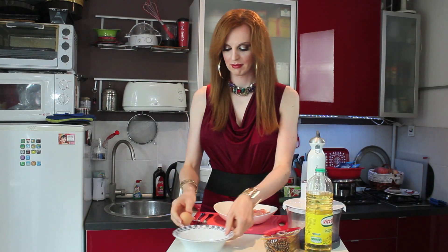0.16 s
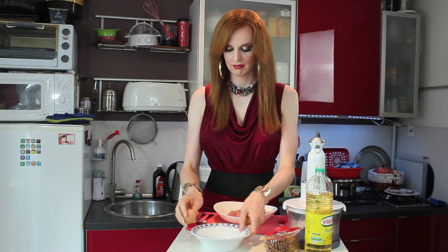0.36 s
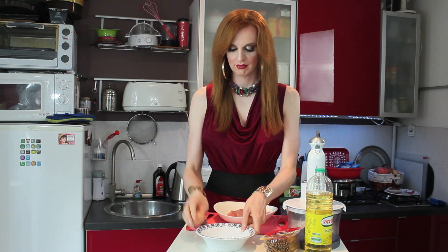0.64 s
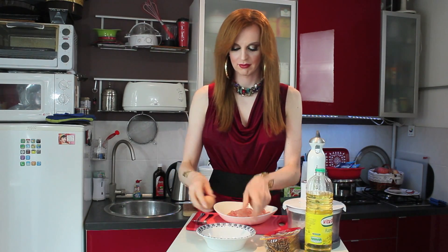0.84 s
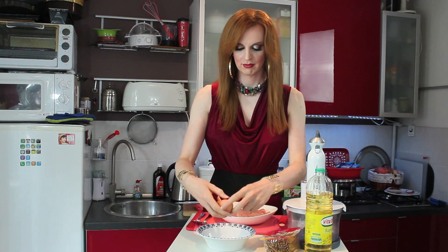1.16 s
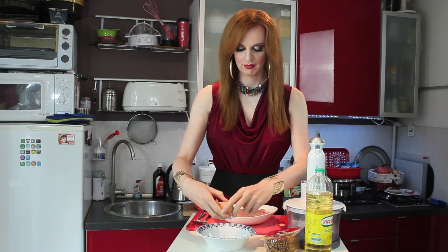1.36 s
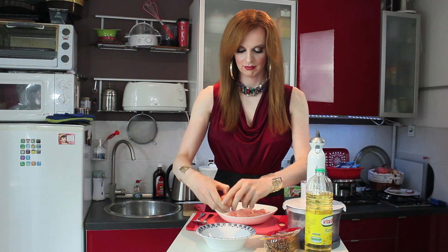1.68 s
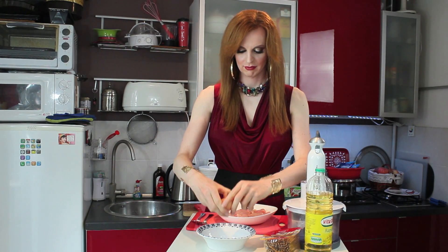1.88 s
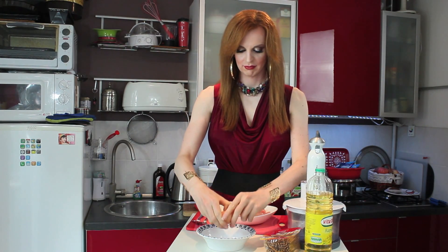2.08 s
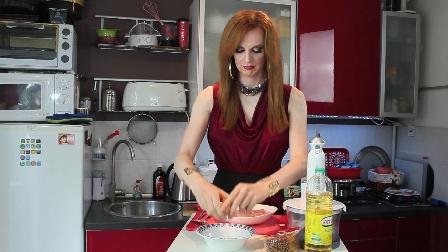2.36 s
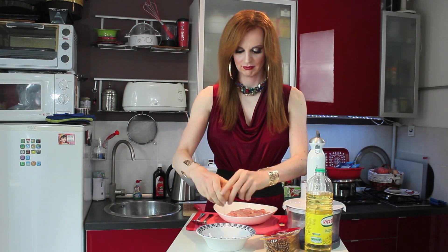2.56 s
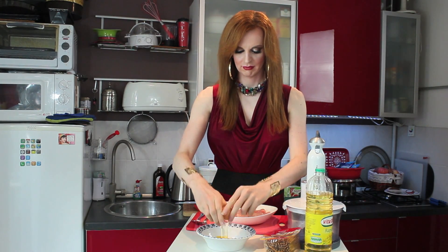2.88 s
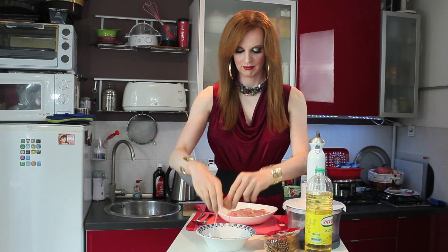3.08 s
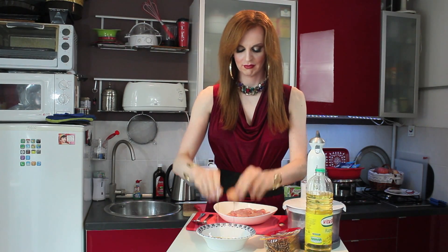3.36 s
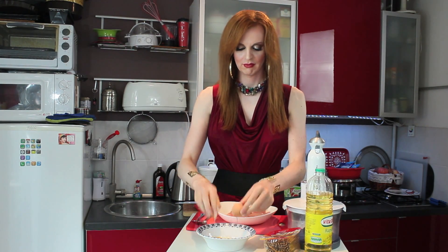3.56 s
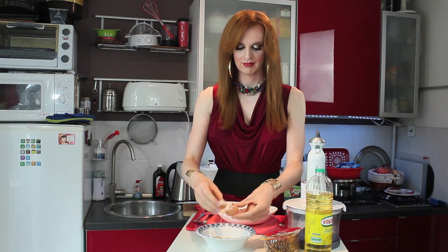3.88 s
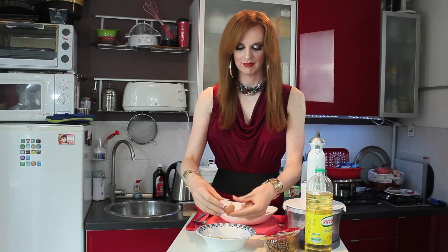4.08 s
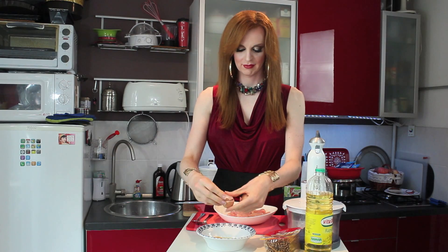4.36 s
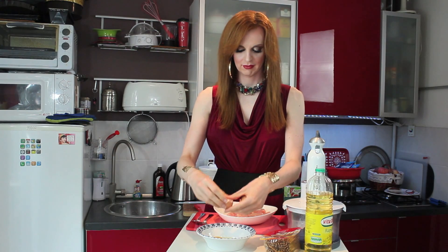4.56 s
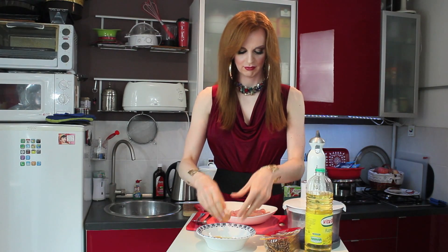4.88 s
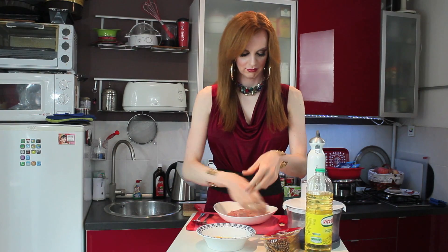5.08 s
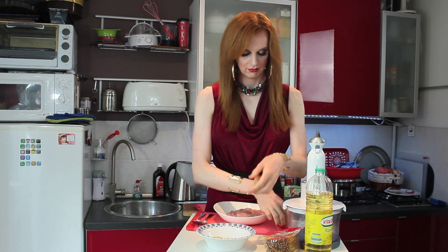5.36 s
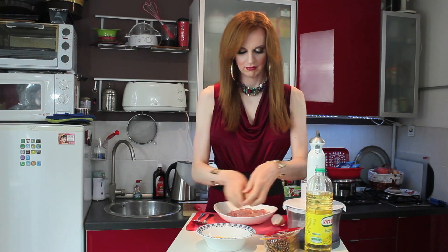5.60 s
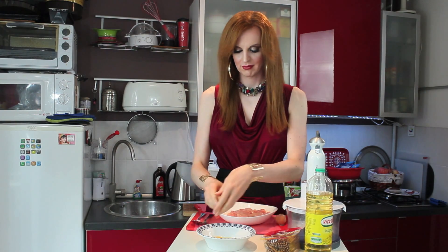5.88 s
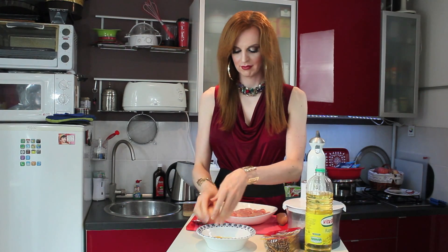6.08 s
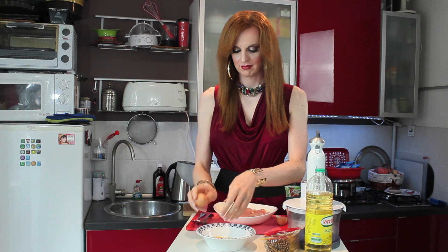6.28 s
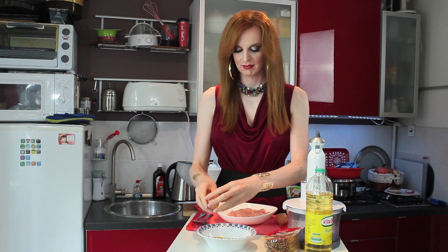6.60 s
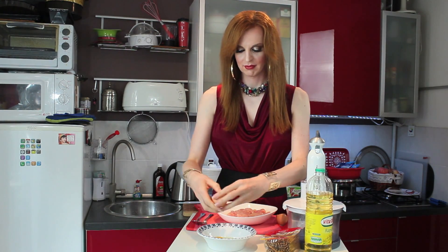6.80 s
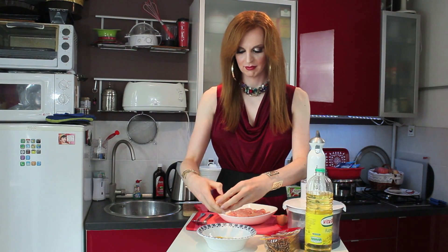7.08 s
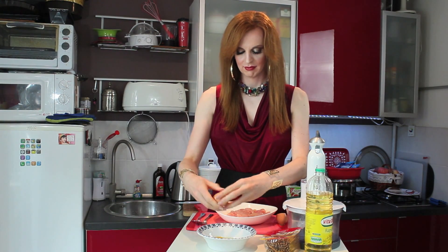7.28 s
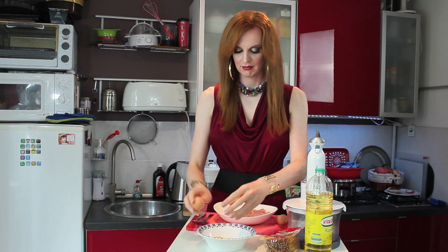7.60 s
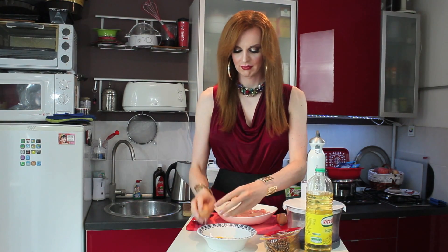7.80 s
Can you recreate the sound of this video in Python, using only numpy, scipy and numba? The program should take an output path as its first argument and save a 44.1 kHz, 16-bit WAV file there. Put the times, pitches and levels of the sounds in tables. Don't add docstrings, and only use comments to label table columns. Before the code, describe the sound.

Eggs knock sharply on a ceramic bowl rim that rings briefly, shells crackle and tear under thumbs, bowl jolts on a hollow worktop in a small kitchen.

```python
import sys
import numpy as np
from scipy import signal
from scipy.fft import rfft, irfft, next_fast_len
from scipy.io import wavfile
from numba import njit

SR = 44100
rng = np.random.default_rng(int(sys.argv[2]) if len(sys.argv) > 2 else 0)


def boost(x):
    u = np.asarray(x, float) / 20
    return 10 ** u


def dump_mix(stems):
    frames = np.atleast_2d(stems).T
    limited = np.clip(frames, -1, 1)
    pcm = np.round(limited * 32767).astype(np.int16)
    wavfile.write(sys.argv[1], SR, pcm)


N = 350154
SPAN = 4096

# (time [s], crack level [dB], crack pitch [Hz], crack treble [dB], crushing time [ms])
BLOWS = [
    (0.6711, 5, 1610, -6, 1.87),
    (6.1872, -9, 2400, -32.5, 1.6),
    (6.4611, 5, 2310, -13.5, 3.1),
    (7.7795, -1, 2800, -14.5, 3.2),
]
# (time [s], level against the last blow [dB])
BRUSH = (.901, -41)
BOWL_HZ = [229, 288, 953, 1056, 2462, 2587, 3715, 4130, 4182, 6000, 6097, 6420, 7938, 8175, 8302, 8690,
           9450, 10460, 11250, 12990, 13800]
# (time to fade by 60 dB [s], level at each of the four blows [dB] x 4)
RINGING = [(0.7, -32.5, -29, -24.5, -32), (0.64, -36.5, -29.5, -42.5, -22.5),
           (0.18, -16.5, -15.5, -29, -21), (1, -47, -36.5, -25, -37), (0.36, -24.5, -4.5, -11, -19.5),
           (0.087, -9, -30.5, -9.5, -11), (0.13, -72.5, -25, -10.5, -19.5),
           (0.25, -40.5, -28.5, -16.5, -19), (0.2, -24.5, -21.5, -19, -18.5), (0.24, -24, -33.5, -32, -51),
           (0.17, -35, -26.5, -22.5, -25.5), (0.42, -64, -49.5, -42.5, -55),
           (0.27, -31.5, -41.5, -28.5, -28.5), (0.11, -33.5, -25, -11, -19), (.19, -23, -32.5, -32.5, -20),
           (0.29, -32, -47.5, -26.5, -29), (0.057, -54, -55.5, -41, -26), (0.11, -32.5, -42.5, -42, -23),
           (0.25, -50.5, -45, -46.5, -33), (.12, -29.5, -49, -34, -24), (.14, -42, -53.5, -30, -31)]

# (time [s], hollow note level [dB], hollow note pitch [Hz], edge snap level [dB])
SNAPS = [(1.53, -19, 1830, -24.5), (1.543, -36, 1380, -49), (1.574, -32, 1090, -29.5),
         (1.656, -26, 1730, -36.5), (1.722, -33, 1540, -41.5), (2.695, -25, 2940, -25),
         (2.779, -20, 2660, -37.5), (3.061, -22, 2350, -36.5), (3.089, -26.5, 2360, -46.5),
         (3.276, -23, 2310, -31.5), (4.084, -19, 1840, -36), (4.155, -31.5, 1700, -50),
         (4.337, -17.5, 1660, -43), (4.36, -28, 2000, -43.5), (4.42, -35, 1600, -49),
         (4.533, -50, 1540, -59), (4.94, -16.5, 1144, -44), (4.945, -23.5, 1690, -51.5)]
# (time [s], hollow level [dB], hollow pitch [Hz], edge snap level [dB])
CRUNCH = [
    (2.723, -10.5, 2130, -19),
    (2.738, -4.5, 2820, -33),
    (2.751, -14.5, 2210, -33.5),
    (4.491, -4.5, 1622, -24),
    (4.509, -35, 1520, -31.5),
]
# (time [s], hollow level [dB], hollow pitch [Hz], edge level [dB])
CLICKS = [
    (0.173, -39, 1220, -52),
    (5.361, -21.5, 1203, -56.5),
    (5.69, -34.5, 1260, -74),
    (5.759, -35.5, 1550, -66),
    (6.679, -37, 1130, -53),
]
# (time [s], hollow level [dB], hollow pitch [Hz], edge snap level [dB], tearing time [ms])
TEARS = [(1.422, -54, 3000, -54, 8), (1.466, -46, 3100, -61, 6.7), (1.498, -63, 1970, -45.5, 6.7),
         (1.643, -35, 1170, -37.5, 15), (2.336, -41, 1050, -51, 3.7), (2.678, -25.5, 2030, -43.5, 33),
         (2.931, -32, 2020, -48, 5.4), (2.951, -42, 2420, -49.5, 7.1), (3.899, -44, 2180, -58, 6.3),
         (4.067, -26, 1770, -40.5, 3.6), (4.279, -39.5, 1760, -62, 5.3), (4.303, -23.5, 1650, -50, 27),
         (4.41, -33, 1660, -51.5, 18), (4.443, -29, 1760, -46.5, 13), (4.466, -16.5, 1570, -33, 12),
         (4.802, -39.5, 1340, -65, 5.7)]
# (frequency [Hz], level [dB])
EDGE = [(250, -6), (800, 8), (3100, 13.5), (5600, 4.5), (9100, -3), (13100, -4), (16100, -9)]
SNAP_TILT_DB, CRUNCH_TILT_DB, CLICK_TILT_DB, TEAR_TILT_DB = 5.5, 2.5, -1, 3.2

# (time [s], panel level [dB], panel pitch [Hz], foot level [dB], contact [ms])
JOLTS = [(0.132, -20, 370, -38.5, 2.4), (0.154, -17, 235, -32.5, 5.8), (0.6735, -8.5, 271, -10.5, 6.4),
         (6.1863, 0.5, 319, -5, 4.1), (6.19, 6, 334, -4.5, 1.17), (6.23, -12, 240, -18, 10.5),
         (6.4622, -8, 270, -10.5, 6.2), (6.517, 0, 235, -13, 5.2), (6.558, -10.5, 440, -15.5, 6.2),
         (6.589, -20, 257, -37, 3), (7.787, -5, 252, -12.5, 6), (7.827, -2, 580, -1.5, 2.4),
         (7.832, 12.5, 387, 0, 0.77), (7.868, -10, 225, -36, 5.9)]
# (time [s], panel level [dB], foot level [dB], loudest foot pitch [Hz])
SET_DOWN = [(2.695, -40, -59, 740), (2.725, -44, -53, 740), (5.36, -12.5, -18, 1190),
            (5.388, -27, -25, 734), (5.479, -25, -48, 716), (5.579, -42, -48, 805), (5.705, -43, -54, 1260),
            (5.797, -41, -57, 1440), (6.002, -14, -33.5, 1320), (6.046, -24, -33.5, 743),
            (6.083, -27, -46.5, 756), (6.108, -51.5, -55, 732)]
# (frequency [Hz], width [Hz], level [dB])
PANELS = [(257.5, 26, 0.5), (336.8, 39, -3.5), (417, 33, -0.5), (466.5, 12, 2.5), (499, 52, -5.5),
          (595, 45, -2.5)]
# (frequency [Hz], width [Hz], level [dB])
FOOT = [(720, 190, 0.5), (1046, 250, 4.5), (1260, 386, 0), (1516, 68, -4.5), (1540, 910, -11)]

# (time [s], drag level [dB])
SLIDE = [
    (0.171, -39),
    (0.178, -31),
    (0.222, -54),
    (0.262, -47),
    (0.392, -38.5),
    (0.5, -49.5),
    (0.649, -70.5),
]
# (level at middling drag [dB], growth per dB of drag [dB])
DRAGGED = [
    (-46.5, .6),
    (-44.5, 0.59),
    (-48.5, 1.3),
]
# (frequency [Hz], level per Hz [dB])
GRIT = [(880, -17), (1500, 0.5), (2320, -7), (3880, -5.5), (5770, -10.5), (7320, -12), (16000, -26.5)]

# (frequency [Hz], time to fade by 60 dB [s])
KITCHEN = [(200, 0.25), (500, 0.3), (2000, 0.24), (6000, 0.25), (14000, 0.17)]
# (frequency [Hz], level per Hz [dB])
HISS = [(12, -34), (20, -28), (27, -14.5), (79, -17), (147, -18.5), (296, -14), (936, -12.5), (1310, -13.5),
        (1640, -13), (14300, -25), (16400, -24.5)]


def bowl_crack():
    s, db, hz, treble_db, ms = np.transpose(BLOWS)
    low = filtered(bursts(ms, spiky_db=1.0), lambda f: resonance(f, hz[:, None], 1300))
    high = filtered(bursts(ms, spiky_db=-12.0), lambda f: resonance(f, 9140, 9800) ** 2)
    return placed(s, sized(low, db - 8, ms) + sized(high, treble_db - 4, ms))


def bowl_ring():
    t = np.arange(SR)[None] / SR
    s, crack_db, *_, ms = np.transpose(BLOWS)
    rocking_db = 3.2 + 0.26 * crack_db
    ring = 0
    for hz, (t60, *levels_db) in zip(BOWL_HZ, RINGING):
        knots = rng.standard_normal((len(s), 64))
        wobble = np.tile(signal.resample(knots, SR // 2, axis=1), 2)
        rocking = wobble * np.exp(-t / 0.2)
        flutter = rocking * rocking_db[:, None] * min(hz / 2500, 1)
        strength = boost(np.array(levels_db)[:, None] + flutter - 60 * t / t60)
        ring = ring + strength * np.sin(2 * np.pi * hz * t + flutter / 4)
    ring = ring * (1 - np.exp(-2000 * t / ms[:, None]))
    brush_s, brush_db = BRUSH
    return placed(np.append(s, brush_s), np.vstack([ring, boost(brush_db) * ring[-1]]))


def shell(events, swell_ms):
    s, db, hz, snap_db, ms, tilt_db = np.transpose(events)
    hz, tilt_db = hz[:, None], tilt_db[:, None]
    slips = bursts(ms, spiky_db=2.5, swell_ms=swell_ms)

    def hollow_body(f):
        return resonance(f, hz, 0.37 * hz) ** 2 + boost(-28) * resonance(f, 3.01 * hz, hz) ** 2

    def edge_colour(f):
        octaves = np.log2(np.clip(f, 2000, None) / 5000)
        return colour(EDGE)(f) * boost(tilt_db * octaves)

    hollow = filtered(slips, hollow_body)
    edge = filtered(slips, edge_colour)
    return placed(s, sized(hollow, db - 9, ms) + sized(edge, snap_db + 2, ms))


def fractures():
    events = []
    for rows, tilt_db in ((SNAPS, SNAP_TILT_DB), (CRUNCH, CRUNCH_TILT_DB), (CLICKS, CLICK_TILT_DB)):
        for row in rows:
            running_ms = 1.24 - 0.19 * row[1]
            events.append((*row, running_ms, tilt_db))
    return sorted(events)


def tears():
    return [(*row, TEAR_TILT_DB) for row in TEARS]


def thuds():
    s, db, hz, reach_hz, foot_db, foot_hz, ms = np.transpose(knocks())
    hz, reach_hz, foot_hz = hz[:, None], reach_hz[:, None], foot_hz[:, None]
    low = filtered(bursts(ms, spiky_db=3.5), lambda f: body(PANELS)(f) * resonance(f, hz, reach_hz) ** 2)
    mid = filtered(bursts(ms, spiky_db=0.5), lambda f: body(FOOT)(f) * resonance(f, foot_hz, 900))
    return placed(s, sized(low, db - 5, ms) + sized(mid, foot_db + 1, ms))


def knocks():
    jolt_reach_hz, jolt_foot_hz = 247, 1072
    panel_hz, reach_hz, contact_ms = 340, 121, 4.4
    events = []
    for s, db, hz, foot_db, ms in JOLTS:
        events.append((s, db, hz, jolt_reach_hz, foot_db, jolt_foot_hz, ms))
    for s, db, foot_db, foot_hz in SET_DOWN:
        events.append((s, db, panel_hz, reach_hz, foot_db, foot_hz, contact_ms))
    return sorted(events)


def slide():
    s, drag_db = np.transpose(SLIDE)
    t = np.arange(N) / SR
    middling_db = -45
    responses = (lambda f: body(PANELS)(f) * resonance(f, 170, 200), body(FOOT), colour(GRIT))
    out = np.zeros(N)
    for (db, grows), response in zip(DRAGGED, responses):
        slips = rng.standard_normal(N) * boost(2.2 * rng.exponential(size=N))
        rub = filtered(slips, response)
        level_db = np.interp(t, s, db + grows * (drag_db - middling_db), left=-120, right=-120)
        out += rub / rub.std() * boost(level_db)
    return out


def low_boom():
    s, db, *_, contact_ms = np.transpose(JOLTS)
    ms = np.full(len(s), 30)
    boom = filtered(bursts(ms, spiky_db=5.0, swell_ms=4.6), lambda f: resonance(f, 116, 110) ** 2)
    return placed(s, sized(boom, db + 10 * np.log10(contact_ms) - 45, ms))


def kitchen(x, piece):
    rows = np.pad(x, (0, -N % piece)).reshape(-1, piece)
    noise = rng.standard_normal((len(rows), SR // 2))
    hz, t, z = signal.stft(noise, SR, nperseg=256)
    fade = boost(-60 * t / along(KITCHEN, hz)[:, None])
    tails = signal.istft(z * fade, SR, nperseg=256)[1]
    tails /= np.linalg.norm(tails, axis=1, keepdims=True)
    starts = np.arange(len(rows)) * piece / SR + 0.003
    return placed(starts, signal.fftconvolve(rows, tails, axes=1))


def hiss():
    x = filtered(rng.standard_normal(N), lambda f: boost(along(HISS, f)))
    return x / x.std() * boost(-56)


def bursts(ms, spiky_db, swell_ms=0.092):
    shape, t_ms = (len(ms), SPAN), np.arange(SPAN) * 1000 / SR
    slips = rng.standard_normal(shape) * boost(spiky_db * rng.exponential(size=shape))
    swell = 1 - np.exp(-t_ms / swell_ms)
    return slips * swell * np.exp(-t_ms / np.minimum(ms, 30)[:, None])


def sized(rows, db, ms):
    energy = np.minimum(ms, 30) * SR / 2000
    return rows / np.linalg.norm(rows, axis=1, keepdims=True) * (boost(db) * np.sqrt(energy))[:, None]


def placed(times, rows):
    at = np.round(times * SR).astype(int)[:, None] + np.arange(rows.shape[1])
    return np.bincount(at.ravel(), rows.ravel(), N + rows.shape[1])[:N]


def resonance(f, hz, width_hz):
    return 1j * f * width_hz / (hz * hz - f * f + 1j * f * width_hz)


def body(modes):
    def response(f):
        return sum((-1) ** k * boost(db) * resonance(f, hz, w) for k, (hz, w, db) in enumerate(modes))
    return response


def colour(points):
    def response(f):
        cepstrum = irfft(np.log(boost(along(points, f)) + 1e-6))
        cepstrum[1:len(f) - 1] *= 2
        cepstrum[len(f):] = 0
        return np.exp(rfft(cepstrum))
    return response


def along(points, hz):
    f, v = np.transpose(points)
    return np.interp(np.log(hz + 1), np.log(f + 1), v)


def filtered(x, response):
    n = x.shape[-1]
    m = next_fast_len(n + SPAN)
    return irfft(rfft(x, m) * response(np.fft.rfftfreq(m, 1 / SR)), m)[..., :n]


def scene():
    ring = bowl_ring()
    eggs = bowl_crack() + shell(fractures(), swell_ms=0.48) + shell(tears(), swell_ms=30)
    worktop = thuds() + slide()
    walls = boost(-10) * kitchen(ring, N)
    walls = walls + kitchen(boost(0.26) * eggs + boost(-2) * worktop, 2 * SPAN)
    bass_cut = signal.butter(5, 200, "high", fs=SR, output="sos")
    near = signal.sosfilt(bass_cut, ring + eggs + worktop + walls)
    return (near + hiss() + low_boom())[None]


@njit
def follower(need, fast, slow):
    out, level = np.empty_like(need), 0.
    for i in range(len(need)):
        level += (need[i] - level) * (fast if need[i] > level else slow)
        out[i] = level
    return out


def roll_off(x):
    return signal.sosfilt(signal.butter(12, 16550, fs=SR, output="sos"), x)


def record(dry):
    over_db = np.clip(20 * np.log10(np.abs(dry[0]) + 1e-9) + 18, 0, 60)
    cut_db = 0.65 * follower(over_db, 1 / (0.02 * SR), 1 / (0.25 * SR))
    x = dry * boost(-cut_db)
    x = x + 0.04 * x * x
    x = x / (1 + np.abs(x / 0.99) ** 8) ** (1 / 8) + 0.001
    x = filtered(x, lambda f: f < 16700)
    return roll_off(x)


dry = scene()
out = record(dry)
dump_mix(out)
```